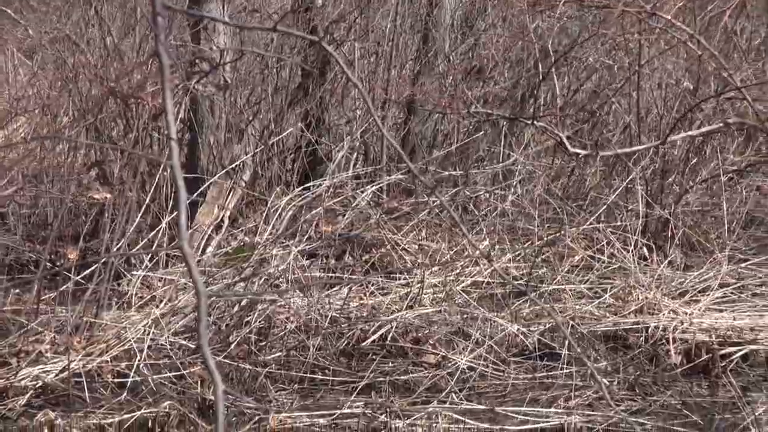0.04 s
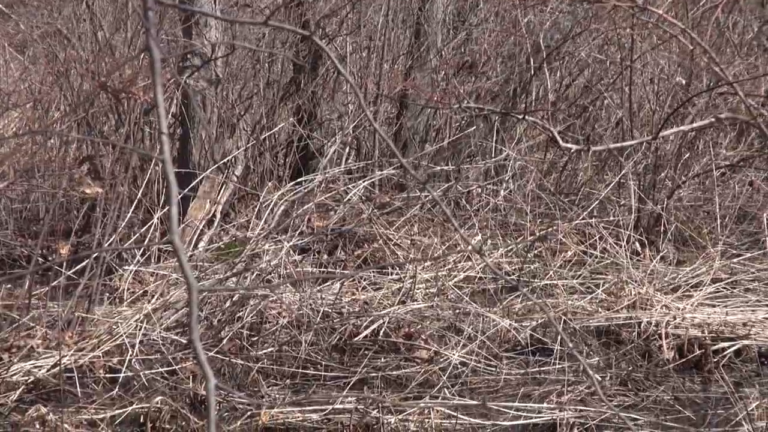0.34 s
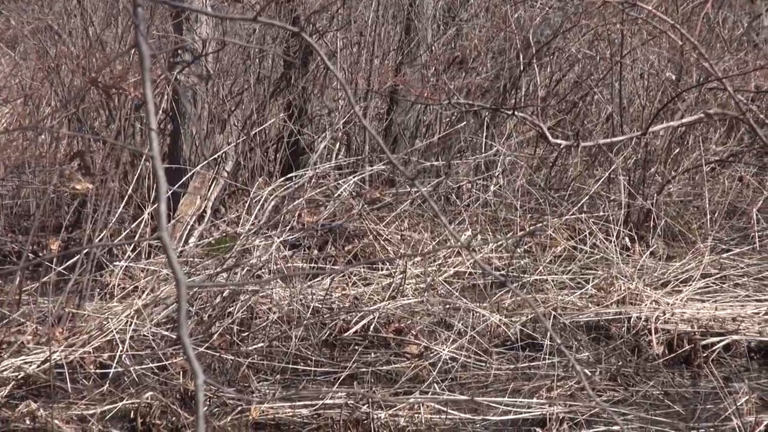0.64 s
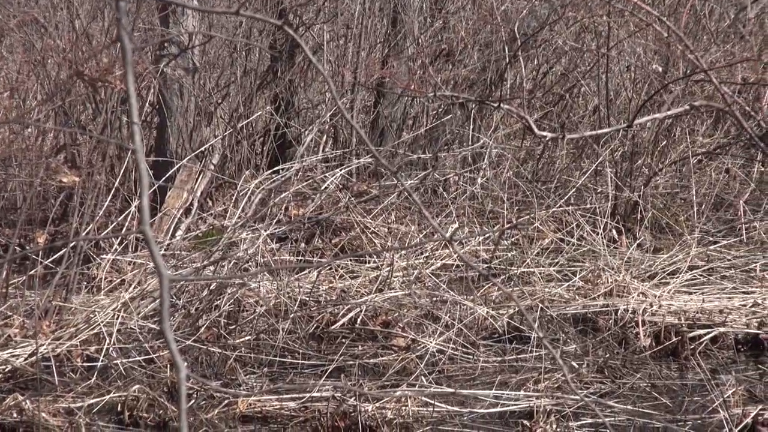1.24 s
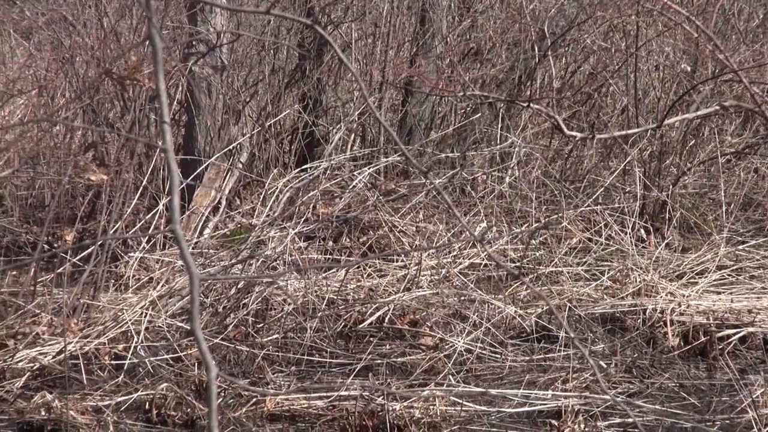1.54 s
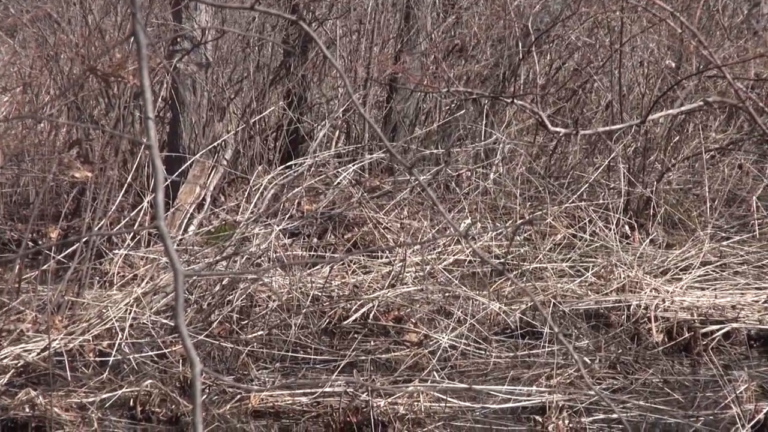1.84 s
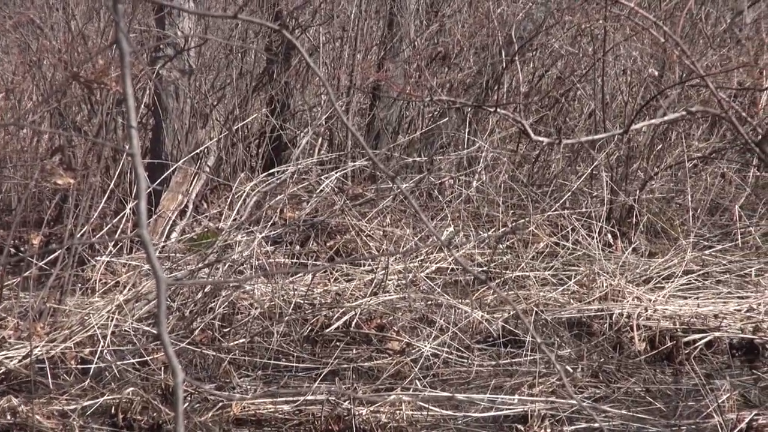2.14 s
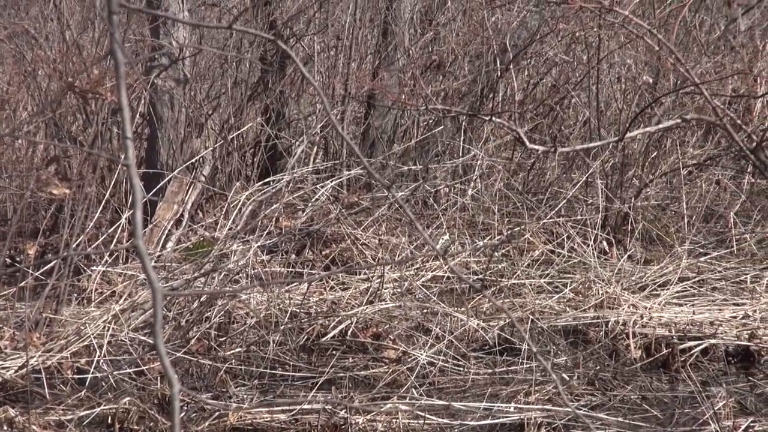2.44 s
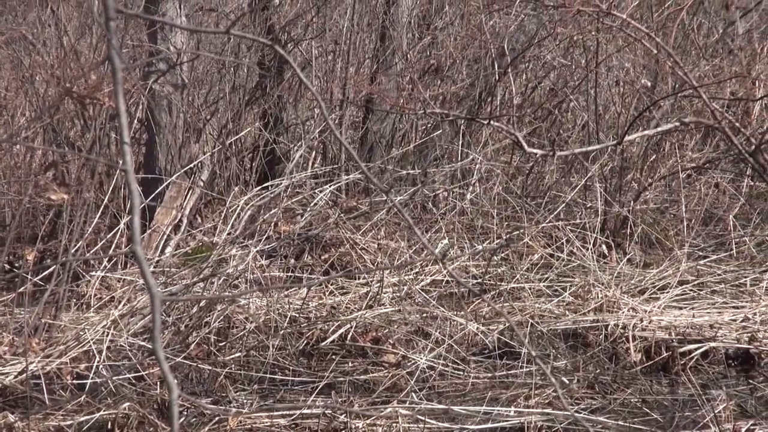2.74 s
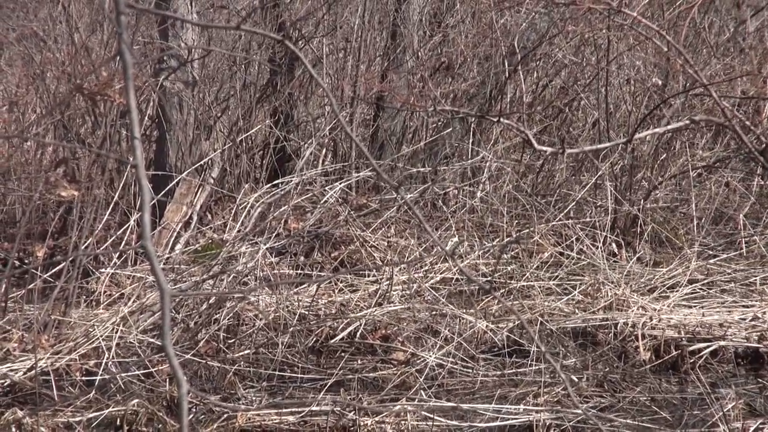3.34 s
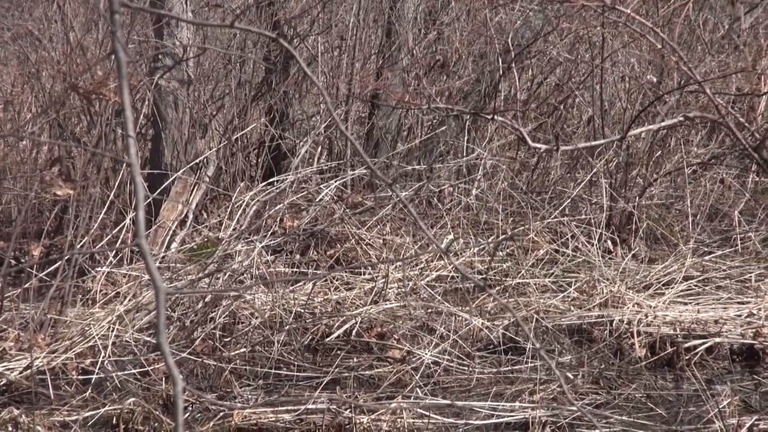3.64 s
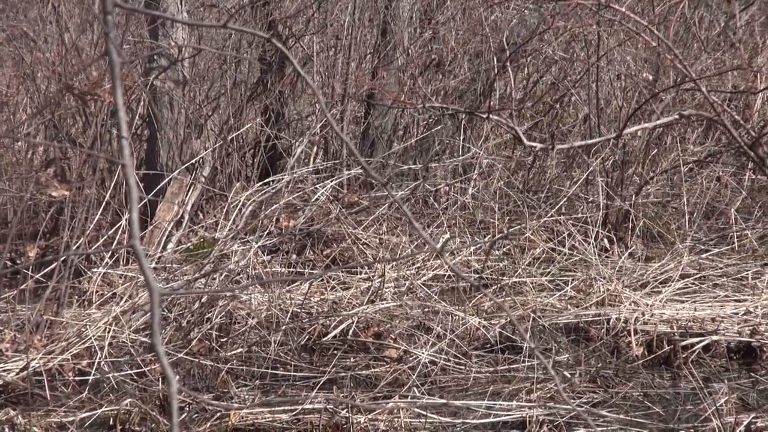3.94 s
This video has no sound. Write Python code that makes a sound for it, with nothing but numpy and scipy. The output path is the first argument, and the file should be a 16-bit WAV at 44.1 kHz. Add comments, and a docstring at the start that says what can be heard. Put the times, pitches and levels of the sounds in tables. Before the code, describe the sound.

A dense chorus of small frogs fills a marsh with high, upward-sliding peeps and two quick trills. The nearest callers sound clear, while farther peeps, faint duck-like frog croaks and a few thin bird notes blur among the trees.

```python
"""Small frogs peep at the edge of a wetland: each near frog repeats its own rising whistle, sent out
by its vocal sac (the throat pouch), and one trills twice. Behind them a far chorus blurs into the
trees, and frogs of another kind quack faintly as quick pulses ring in their throats.
Two thin far whistles and one chip, probably birds, and a low rumble of air lie underneath."""
import sys
import numpy as np
from scipy import signal
from scipy.fft import rfft, irfft, next_fast_len
from scipy.io import wavfile
from scipy.ndimage import map_coordinates

SR = 44100
rng = np.random.default_rng(int(sys.argv[2]) if len(sys.argv) > 2 else 0)


def dump(signal):
    """Clip the signal to [-1, 1] and save it as 16-bit WAV at the path in sys.argv[1]."""
    limited = np.clip(np.atleast_2d(signal).T, -1, 1)
    pcm = np.round(limited * 32767).astype(np.int16)
    wavfile.write(sys.argv[1], SR, pcm)


N = 176400  # 4 seconds

# The tone colour of the air and far din, also used for the trill's rasp: (frequency [Hz], level [dB])
AIR_COLOUR = [(100, -1.5), (420, -6.5), (690, -2), (1150, -8.5), (1550, -1), (2100, -6.5), (2700, -1),
              (3800, -15), (4700, -8.5), (5400, -22), (14000, -29.5)]

ATTACK_S, RELEASE_S = 0.0048, 0.0033  # how fast a peep starts and stops
FLUTTER_DB, FLUTTER_PER_S = 1.16, 110  # small, quick changes of loudness


def near_frogs():
    """The near frogs peep, each with its own rising glide."""
    # Each frog's voice: (start pitch [Hz], end pitch [Hz], upward bend of the glide [Hz],
    # overtone boost [dB], growth over the peep [dB])
    voices = {"nearest": (2826, 3085, 5.5, -1, -0.5), "low": (2692, 2936.5, 13, 0, 1.5),
              "middle": (2898.5, 3285.5, 8.5, 4, -1.5), "high": (3370.5, 3688.5, 11, 9.5, 0.5),
              "thin": (3350.5, 3535, 34.5, 10.5, 1), "quick": (3043, 3332, 6, 6, -5),
              "slow": (2710, 3303, -36.5, 8, 7.5), "short": (3065, 3191, 32, 4.5, -2.5),
              "reedy": (2654, 2973, -30, 11, 1.5), "soft": (3117.5, 3256, 33, 13.5, 0.5),
              "lone": (2924.5, 3145.5, 34.5, 7, -3.5), "round": (3150, 3302.5, 32, 3, -3.5)}
    # Voices that jump up in mid-peep: (when [share of the peep], jump [Hz])
    leaps = {"low": (0.23, 68)}
    # Each frog's peeps: (start [s], length [s], level [dB])
    peeps = {"nearest": [(.04, .102, -18.5), (1.019, 0.088, -18.5), (2.041, .1, -18.5), (2.844, .101, -19),
             (3.768, .085, -18.5)], "low": [(.057, 0.18, -23.5), (.983, .175, -22.5), (1.82, 0.16, -22.5),
             (2.619, .172, -22.5), (3.544, 0.17, -22.5)], "middle": [(.289, .138, -26.5),
             (1.208, .13, -27.5), (2.023, 0.12, -25), (2.838, 0.12, -23.5), (3.738, 0.15, -26)],
             "high": [(.354, .087, -32), (.849, .082, -30.5), (1.383, .083, -30.5)],
             "thin": [(2.503, .072, -30)], "quick": [(.489, .09, -25.5), (1.397, .091, -26),
             (2.192, .099, -26), (3.49, .09, -32.5)], "slow": [(.808, 0.23, -26), (2.25, 0.26, -27),
             (3.704, .252, -27.5)], "short": [(.618, .055, -23), (1.918, 0.057, -22.5), (2.378, .06, -22),
             (2.829, 0.058, -21.5), (3.22, 0.071, -24), (3.733, 0.078, -22)], "reedy": [(1.188, .108, -27),
             (1.752, .11, -27.5), (2.198, .118, -28)], "soft": [(.198, .072, -32), (.9, 0.096, -31.5),
             (1.523, .075, -32.5)], "round": [(2.575, .066, -24), (3.528, .05, -25)],
             "lone": [(2.979, .093, -25)]}
    out = np.zeros(N)
    for frog, calls in peeps.items():
        for start, length, db in calls:
            add(out, start, amp(db) * peep(length, *voices[frog], leap=leaps.get(frog, (0, 0))))
    return out


def peep(length, start_hz, end_hz, bend_hz, overtone_db=None, growth_db=0, leap=(0, 0),
         attack=ATTACK_S, release=RELEASE_S):
    """One whistle: it scoops up into its glide, swells and stops."""
    scoop_hz, swell_db = 108, 2.5
    n = int(length * SR)
    t, progress = np.arange(n) / SR, np.linspace(0, 1, n)
    arch = 1 - (2 * progress - 1) ** 2  # 0 at both ends, 1 in the middle
    leap_at, leap_hz = leap
    hz = start_hz + (end_hz - start_hz) * progress + bend_hz * arch
    hz -= scoop_hz * np.exp(-2 * t / ATTACK_S)
    hz += leap_hz * np.clip((t - leap_at * length) / ATTACK_S, 0, 1)
    fade = np.clip(np.minimum(t / attack, (length - t) / release), 0, 1)
    db = swell_db * (arch - 1.5) + growth_db * (progress - .5) + FLUTTER_DB * wobble(FLUTTER_PER_S, n)
    return throat(hz, overtone_db) * fade * amp(db)


def throat(hz, overtone_db=None, sac=1):
    """The voice box vibrates at hz / 2. The sac sends out twice that pitch; other multiples are faint."""
    # The faint tones' strength next to the main whistle: (frequency [Hz], level [dB])
    overtones = [(1500, -43), (4200, -34.5), (4800, -35.5), (5400, -45.5), (6400, -45.5), (7600, -57),
                 (11500, -71), (12800, -53.5), (14000, -68)]
    waver_hz = 9.16 * wobble(88.6, len(hz))
    phase = 2 * np.pi * (np.cumsum(hz + waver_hz) / SR + rng.random())
    tone = sac * np.sin(phase)
    if overtone_db is not None:
        for k in (1, *range(3, 10)):
            flutter_db = 2 * FLUTTER_DB * wobble(FLUTTER_PER_S, len(hz))
            db = overtone_db + look_up(overtones, hz * k / 2) + flutter_db
            tone += amp(db) * np.sin(phase * k / 2)
    return np.sqrt(2) * tone


def trills():
    """Short arched notes climb, slow down and grow shriller; the sac rings most at each arch's top."""
    # One frog's trills: (first note [s], last note [s], level [dB])
    runs = [(0.299, 0.486, -24.5), (3.16, 3.376, -25)]
    note_s, notes_per_s, slowing = .021, 36.5, 1.07
    start_hz, climb_hz, last_arch_hz = 2650, 500.5, 620
    loudest_at, last_overtone_db, rasp_db = 0.58, 9, -26
    out = np.zeros(N)
    in_note = np.linspace(-1, 1, int(note_s * SR))  # 0 is the middle of a note
    fade = np.minimum(10 * (1 - np.abs(in_note)), 1)
    sac = np.cos(np.pi * in_note / 2)
    for start, end, db in runs:
        for progress in np.linspace(0, 1, round((end - start) * notes_per_s) + 1):
            arch_hz = last_arch_hz * (1 + progress) / 2
            hz = start_hz + climb_hz * progress - arch_hz * np.abs(in_note) ** 3
            swell = amp(-33 * (progress - loudest_at) ** 2)
            note = throat(hz, last_overtone_db * progress, sac * swell)
            add(out, start + (end - start) * progress ** slowing, amp(db) * fade * note)
    return out + amp(rasp_db) * np.abs(out) * noise(AIR_COLOUR)


def far_frogs():
    """A far chorus at many distances, blurred by the trees and already calling at the start."""
    calls_per_s, length_s, chorus_db = 20, 0.0965, -40.5
    centre_hz, spread_hz, glide_hz = 3113, 190, 195
    out = np.zeros(N + SR)  # begins one second early
    for k in range(int(len(out) / SR * calls_per_s)):
        off_centre = 1 - rng.gamma(2) / 2 + rng.normal(0, 0.62)
        hz = centre_hz + spread_hz * off_centre
        call = peep(length_s, hz - glide_hz / 2, hz + glide_hz / 2, glide_hz / 10, overtone_db=0)
        start = (k + rng.random()) / calls_per_s
        db = rng.normal(0, 4.6) - 2 * off_centre ** 2  # unusual pitches are quieter
        add(out, start, amp(db) * call)
    return amp(chorus_db) * unit((tree_echo(out) / 2 + out)[SR:])


def quacking_frogs():
    """Frogs of another kind quack further back in the marsh."""
    # The quacks: (time [s], lower throat ring [Hz], level [dB])
    calls = [(0.386, 953, -47), (0.882, 746, -47), (1.243, 792, -46.5), (1.362, 831, -51),
             (1.825, 739, -49.5), (2.055, 812, -51.5), (2.262, 850.4, -44), (2.426, 629, -47),
             (2.484, 716, -45), (3.44, 656, -43), (3.561, 776, -49.5), (3.675, 717, -46.5),
             (3.972, 824, -51)]
    low_cut_hz = 380
    out = np.zeros(N)
    for start, hz, db in calls:
        add(out, start, amp(db) * quack(hz))
    return filtered(out, lambda hz: 1 - 1 / (1 + (hz / low_cut_hz) ** 10))


def quack(hz):
    """A burst of pulses, about an octave below hz, rings the throat at hz and at a higher pitch."""
    # Higher quacks pulse less evenly and sound rough: (lower throat ring [Hz], unevenness [share])
    unevenness = [(700, .06), (890, .35)]
    burst_s, ring_s = 0.024, .016
    t, n = np.arange(SR // 20) / SR, int(burst_s * SR)
    upper_hz, upper_db = 1690 * rng.normal(1, 0.087), rng.normal(1.5, 0.67)
    ring = np.sin(2 * np.pi * hz * t) - amp(upper_db) * np.sin(2 * np.pi * upper_hz * t)
    ring *= amp(-60 * t / ring_s)
    effort = np.sqrt(np.hanning(n))  # lifts both pitch and loudness in the middle
    pulse_hz = hz / 2 * np.exp((effort - 1) / 10 + look_up(unevenness, hz) * wobble(hz, n))
    pulses = np.diff(np.floor(np.cumsum(pulse_hz) / SR), prepend=0)  # one click per cycle
    call = signal.fftconvolve(pulses * effort, ring)
    return call / (np.std(call[:n]) + 1e-9)


def birds():
    """Thin, even whistles far off and one falling chip with a weaker tone an octave below."""
    # The far whistles: (start [s], length [s], pitch [Hz], level [dB])
    whistles = [(0.587, 0.16, 2346, -48), (3.392, 0.29, 2332, -47)]
    # The chip: (start [s], length [s], start pitch [Hz], end pitch [Hz], level [dB])
    chips = [(1.16, .054, 3980, 3700, -40)]
    out = np.zeros(N)
    for start, length, hz, db in whistles:
        add(out, start, amp(db) * peep(length, hz, hz, 0, attack=length / 2, release=length / 2))
    for start, length, start_hz, end_hz, db in chips:
        bend_hz = (start_hz - end_hz) / 2
        chip = peep(length, start_hz, end_hz, bend_hz, attack=length / 2)
        octave_below = peep(length, start_hz / 2, end_hz / 2, bend_hz / 2, attack=length / 2)
        add(out, start, amp(db) * (chip + octave_below / 2))
    return out


def tree_echo(x):
    """The trees scatter a sound into a soft echo, returned as loud as the sound itself."""
    # How long the echo lasts: (frequency [Hz], time to fade by 60 dB [s])
    fade_times = [(300, 0.2), (3000, 0.88), (6000, 1), (13000, .15)]
    hz, t, spectrum = signal.stft(rng.standard_normal(SR), SR, nperseg=256)
    fade = amp(-60 * t / look_up(fade_times, hz)[:, None])
    tail = signal.istft(spectrum * fade, SR, nperseg=256)[1]
    return unit(signal.fftconvolve(x, tail)[:len(x)]) * np.std(x)


def air():
    """A faint steady din and a low rumble of air that swells in soft bumps."""
    # The bumps of air: (start [s], length [s], level [dB])
    bumps = [(1.15, 0.11, -44.5), (2.262, 0.14, -48.5)]
    # The rumble's tone colour: (frequency [Hz], level [dB])
    rumble_colour = [(30, -13.5), (58, 14.5), (80, -7.5), (160, -7.5), (900, -64.5)]
    din_db, rumble_db = -54.5, -61.5
    swell = np.full(N, amp(rumble_db))
    for start, length, db in bumps:
        add(swell, start, amp(db) * np.hanning(int(length * SR)))
    return amp(din_db) * noise(AIR_COLOUR) + swell * noise(rumble_colour)


def amp(db):
    """Turn decibels into a number to multiply by."""
    return 10 ** (np.asarray(db) / 20)


def unit(x):
    """Scale a sound to an average strength (rms) of 1."""
    return x / np.sqrt(np.mean(x ** 2) + 1e-20)


def look_up(points, hz):
    """Read between the rows of a (frequency [Hz], value) table, with octaves evenly spaced."""
    frequencies, values = np.transpose(points)
    return np.interp(np.log(hz + 1), np.log(frequencies + 1), values)


def wobble(rate, n):
    """A smooth curve of n samples through `rate` random points a second."""
    return map_coordinates(rng.standard_normal(256), [np.arange(n) * rate / SR], mode="wrap")


def filtered(x, gain):
    """Turn each frequency of x up or down by gain(hz)."""
    size = next_fast_len(N + SR // 2)
    return irfft(rfft(x, size) * gain(np.fft.rfftfreq(size, 1 / SR)), size)[:N]


def noise(colour):
    """Noise of strength 1 with the given tone colour."""
    return unit(filtered(rng.standard_normal(N), lambda hz: amp(look_up(colour, hz))))


def add(out, start_s, x):
    """Mix x into out at the given time."""
    i = round(start_s * SR)
    x = x[max(-i, 0):max(len(out) - i, 0)]
    out[max(i, 0):][:len(x)] += x


def scene():
    """Peeps, trills, birds and quacks echo in the trees, over the far chorus and the air."""
    call_echo_db, quack_echo_db = -12, -0.5
    calls = near_frogs() + trills() + birds()
    quacks = quacking_frogs()
    echoes = amp(call_echo_db) * tree_echo(calls) + amp(quack_echo_db) * tree_echo(quacks)
    return (calls + quacks + echoes + far_frogs() + air())[None]


def record(dry):
    """Soften the deepest bass and cut off the highest treble."""
    low_cut_hz, top_hz = 48, 14300
    return filtered(dry[0], lambda hz: (1 - 1 / (1 + (hz / low_cut_hz) ** 6)) * (hz < top_hz))[None]


dry = scene()
out = record(dry)
dump(out)
```